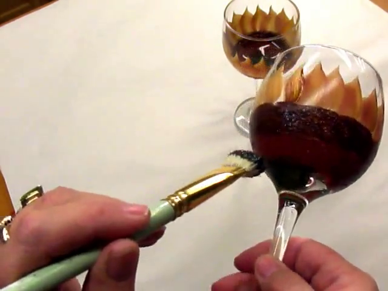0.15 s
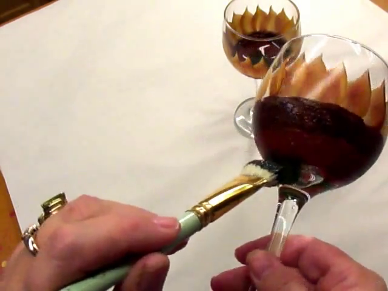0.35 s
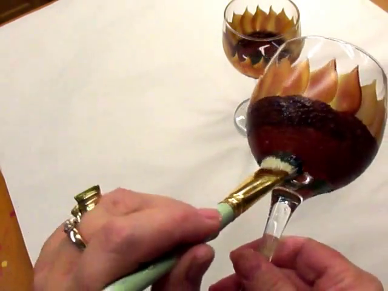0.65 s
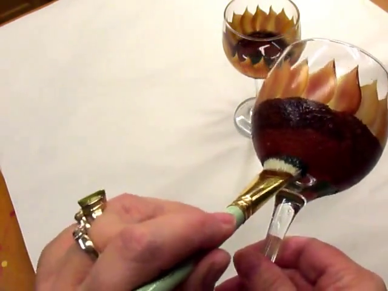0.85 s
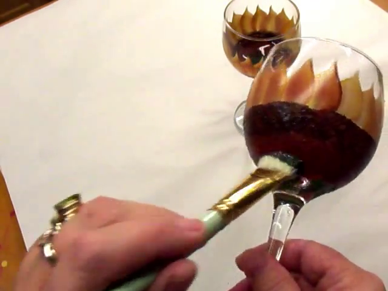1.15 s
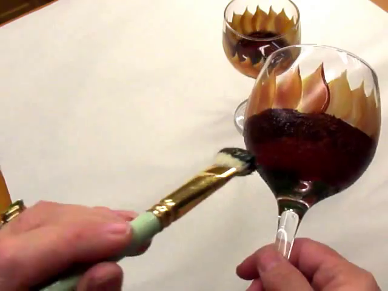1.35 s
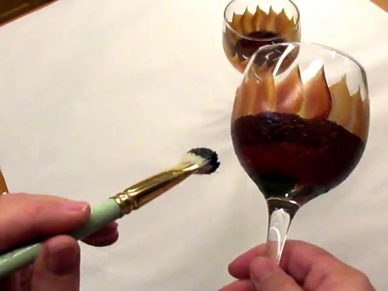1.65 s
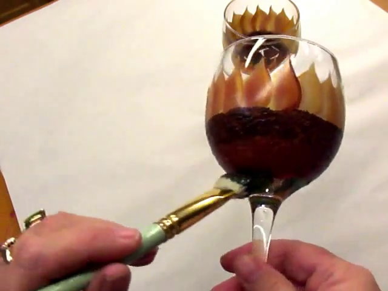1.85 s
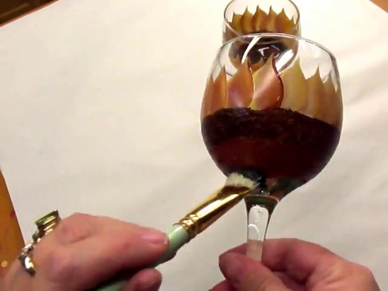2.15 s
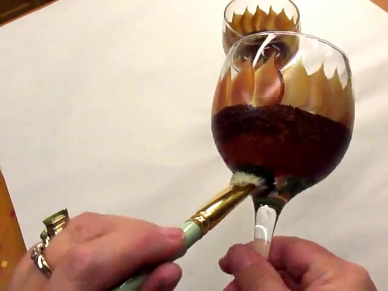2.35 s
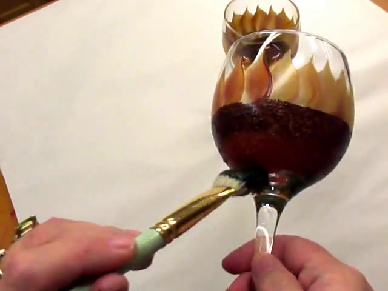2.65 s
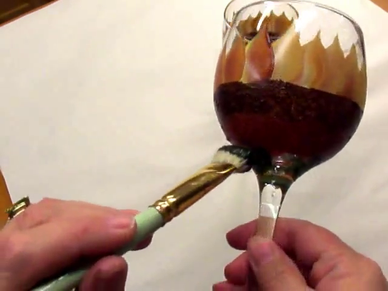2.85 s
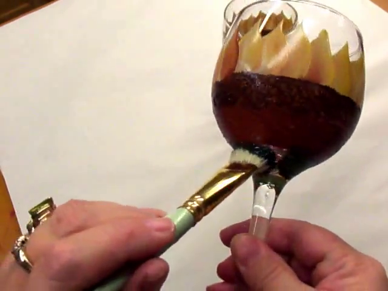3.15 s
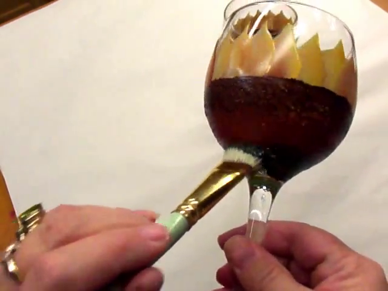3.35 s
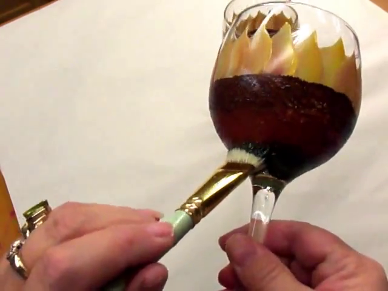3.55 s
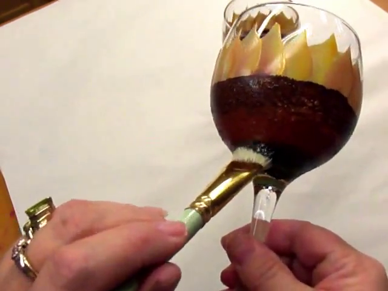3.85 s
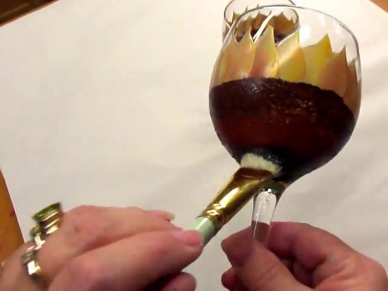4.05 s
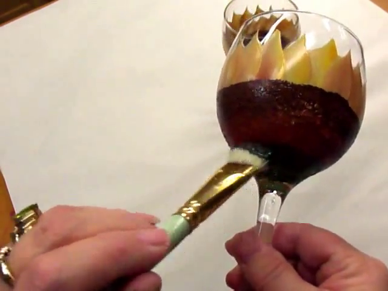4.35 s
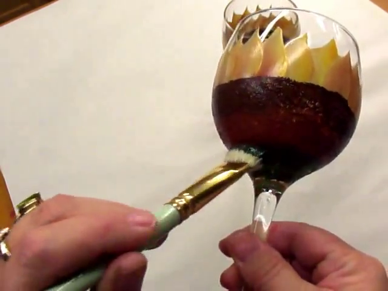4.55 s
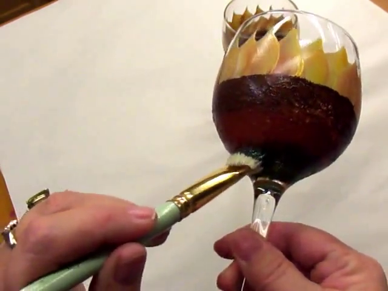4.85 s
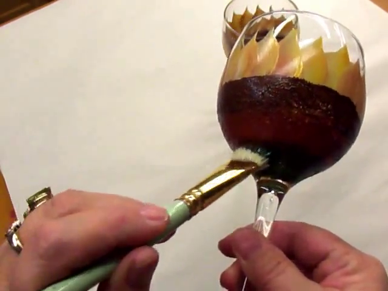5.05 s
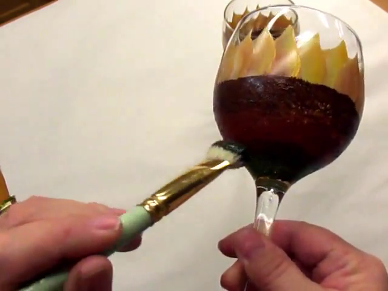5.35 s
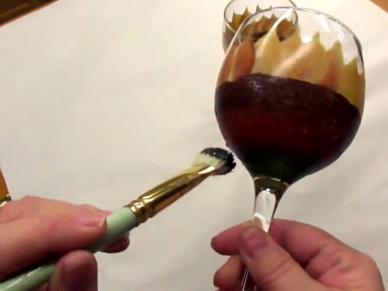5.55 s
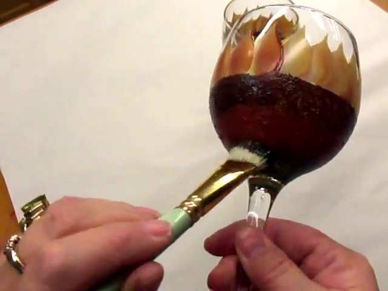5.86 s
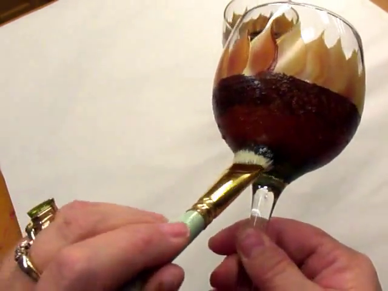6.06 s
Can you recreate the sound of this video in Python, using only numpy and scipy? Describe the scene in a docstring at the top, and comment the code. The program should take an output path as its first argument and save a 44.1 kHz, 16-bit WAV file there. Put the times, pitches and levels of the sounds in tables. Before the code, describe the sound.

Close by in a small quiet room, a brush dabs tacky paint on a wine glass. A few tiny snaps come early, then the glass knocks once on the table: a loud, hard clack with a thump and a short glassy ring. Afterwards the snaps grow dense, then thin to fine crackle. Soft air noise, mains hum and a faint fan whine run underneath.

```python
"""A flat brush dabs wet paint on a hand-held wine glass in a small, quiet room.
Air noise, mains hum and a faint fan whine lie underneath; the whine swells about one second in and holds.
Tacky paint lets go in tiny snaps: a few early on, a dense run in the middle, fine crackle to the end.
In between, at 2.5 s, the glass knocks once on the table: a clack, a thump and a faintly ringing bowl.
Snaps are filtered pulses, the knock is fading sines and noise, the background is noise and steady sines."""
import sys
import numpy as np
from scipy import signal
from scipy.fft import rfft, irfft
from scipy.io import wavfile

SR = 44100
rng = np.random.default_rng(int(sys.argv[2]) if len(sys.argv) > 2 else 0)


def waveform_to_disk(signal):
    """Save audio, clipped to [-1, 1], as 16-bit WAV at the path in sys.argv[1]."""
    frames = np.transpose(np.atleast_2d(signal))
    scaled = np.clip(frames, -1, 1) * 32767
    samples = np.round(scaled).astype(np.int16)
    wavfile.write(sys.argv[1], SR, samples)


N = 273552  # length of the sound in samples


def brush():
    """Paint and bristles let go of the glass close by; the room answers a little."""
    dry = snaps(gain_db=-0.5, rustle=0.12, rustle_t60_s=0.0095)
    dry = dry + crackle(per_second=330, spread_db=8, pitch_hz=4400, width_hz=5000)
    # a gentle low-pass rounds off the very top of the snaps and crackle
    low_pass = signal.butter(4, 10300, fs=SR, output="sos")
    dry = signal.sosfilt(low_pass, dry)
    return room(dry, wet_db=-8.5, t60_s=0.089, gap_s=0.004)


# The loudest snaps of paint; peak level is before the brush gain, glass_db is how strongly the glass answers.
# Columns: start_s, peak_db, pitch_hz, width_hz, glass_db
LOUD_SNAPS = [(0.7575, -24, 5100, 6500, 2), (0.782, -35, 5000, 4000, -2), (0.9255, -36, 2800, 3600, -2),
              (1.06, -33, 4600, 6000, -4), (1.0733, -34, 4200, 8000, 0), (1.1461, -28, 3200, 6400, -6),
              (1.1567, -28, 4200, 8400, 0), (1.16, -29, 2800, 5200, 4), (1.1667, -30, 4600, 4600, -2),
              (1.2709, -34, 4600, 4600, -2), (2.2395, -19, 5940, 9300, -8), (2.3911, -29.5, 6200, 3700, -2),
              (3.173, -34.5, 4600, 3700, -2), (3.2637, -24.5, 4550, 2700, -6), (3.2783, -29, 3600, 4700, 0),
              (3.5353, -31, 4200, 6700, -6), (3.6138, -29.5, 3200, 5100, -6), (3.6884, -25, 2600, 6800, -9),
              (3.704, -27, 3800, 4900, -6), (3.798, -26, 8000, 8040, -2), (3.807, -25.5, 6750, 10800, 3),
              (3.8183, -30, 4400, 7000, 0), (3.9017, -34, 5000, 4000, -2), (3.9453, -20, 4200, 12000, -6),
              (4.0123, -29, 4800, 3800, -4), (4.0322, -25.5, 4200, 5500, -10), (4.183, -31, 8200, 4900, -2),
              (4.2123, -21.5, 7300, 7350, 0), (4.2922, -26, 6000, 6000, 0), (4.2968, -25.5, 7000, 7000, -2),
              (4.3038, -23, 6440, 6400, -5), (4.3307, -30, 5500, 4600, -6), (4.342, -33, 6000, 7800, -4),
              (4.363, -30.5, 6000, 7000, -2), (4.6922, -30, 5200, 11000, 10),
              (4.7093, -31.5, 6600, 10500, -2), (5.258, -34, 3400, 5400, -6)]
# A snap tears a neighbouring thread soon after: weaker, and at a nearby pitch.
FOLLOW_GAP_S, FOLLOW_SPREAD_S = 0.005, 0.018
FOLLOW_DB, FOLLOW_OCTAVES = -16, 0.25


def snaps(gain_db, rustle, rustle_t60_s):
    """Each loud snap of paint, and the weaker one that it sets off a moment later."""
    out = np.zeros(N)
    for start_s, peak_db, pitch_hz, width_hz, glass_db in LOUD_SNAPS:
        wait, detune = rng.random(2)
        peak_db = peak_db + gain_db
        first = snap(peak_db, pitch_hz, width_hz, glass_db, rustle, rustle_t60_s)
        add(out, start_s, first)

        next_s = start_s + FOLLOW_GAP_S + FOLLOW_SPREAD_S * wait
        next_hz = pitch_hz * 2 ** (FOLLOW_OCTAVES * (2 * detune - 1))
        follower = snap(peak_db + FOLLOW_DB, next_hz, width_hz, glass_db, rustle, rustle_t60_s)
        add(out, next_s, follower)
    return out


# What the glass answers a snap with; each snap's glass_db is added to the level.
# Columns: pitch_hz, width_hz, level_db
GLASS_ANSWER = [(1410, 390, -4), (2200, 130, 3), (2750, 230, 0), (3060, 87, -25.5)]


def snap(peak_db, pitch_hz, width_hz, glass_db, rustle, rustle_t60_s):
    """A thread of paint breaks in one sharp pulse; the freed bristle quivers and the glass rings briefly."""
    t = np.arange(SR // 40) / SR
    quiver = rustle * rng.standard_normal(len(t)) * fade(t, rustle_t60_s)
    pulse = (t == 0) + quiver
    click = band(band(pulse, pitch_hz, width_hz), pitch_hz, width_hz)
    envelope = np.abs(signal.hilbert(click))
    click = click * undb(peak_db) / envelope.max()
    glass = sum(undb(mode_db + glass_db) * band(click, mode_hz, mode_width_hz)
                for mode_hz, mode_width_hz, mode_db in GLASS_ANSWER)
    return click + glass


# The brush works in the paint; level is that of the fine crackle before low-pass and room.
# Columns: start_s, end_s, level_db
BRUSH_DABS = [(0.9, 1.4, -70), (2.1, 3.35, -68.5), (3.35, 3.9, -63.5), (3.9, 5.3, -66), (5.65, 6.2, -67)]
DAB_EASE_S = 0.13  # the bristles take this long to bend and to straighten


def crackle(per_second, spread_db, pitch_hz, width_hz):
    """Countless smaller snaps at random moments while the brush presses and lifts."""
    pressure = np.zeros(N)
    for start_s, end_s, level_db in BRUSH_DABS:
        pressure += undb(level_db) * (ramp(start_s, DAB_EASE_S) - ramp(end_s, DAB_EASE_S))
    # many small grains and a few large ones, pushing either way
    size_db = spread_db * np.minimum(rng.exponential(size=N), 3)
    sizes = undb(size_db) * rng.choice([-1, 1], N)
    grains = sizes * (rng.random(N) < per_second / SR)
    coloured = band(band(grains, pitch_hz, width_hz), pitch_hz, width_hz)
    return level(coloured, 0) * pressure


def room(x, wet_db, t60_s, gap_s):
    """Direct sound, then a short spray of reflections from table and walls."""
    t = np.arange(SR // 2) / SR
    tail = rng.standard_normal(len(t)) * fade(t, t60_s) * (t > gap_s)
    tail = tail / np.linalg.norm(tail)
    return x + undb(wet_db) * signal.fftconvolve(x, tail)[:N]


KNOCK_S = 2.5174  # when the glass meets the table


def knock():
    """One hard contact clacks and sets table, foot and bowl ringing; the room dies away behind it."""
    out, t = np.zeros(N), np.arange(SR) / SR
    contact_s = 0.00025  # how quickly ring and crack come in
    contact = 1 - np.exp(-t / contact_s)
    struck = ring(t, gain_db=0.9) + crack(t, start_db=-24.5, t60_s=0.013)
    dense = dense_ringing(t, early_db=-24.5, early_t60_s=0.081, build_s=0.0027,
                          late_db=-32, late_t60_s=0.26)
    add(out, KNOCK_S, clack(t) + struck * contact + dense)
    # the microphone's low cut thins the deep bass of the knock
    return signal.sosfilt(signal.butter(2, 85, "high", fs=SR, output="sos"), out)


# The clack while foot and table are still pressed together.
# Columns: pitch_hz, level_db, length_s
CONTACT_CLACK = [(1270, -13.5, .0046), (3190, -18, .003)]


def clack(t):
    """Short sine bursts that swell and sink once during the contact."""
    out = np.zeros(len(t))
    for pitch_hz, level_db, length_s in CONTACT_CLACK:
        push = np.sin(np.pi * np.minimum(t / length_s, 1))
        out += undb(level_db) * np.sin(2 * np.pi * pitch_hz * t) * push
    return out


def crack(t, start_db, t60_s):
    """A bright burst of noise around 7.7 kHz that fades at once."""
    return level(band(rng.standard_normal(len(t)), 7700, 6000), start_db) * fade(t, t60_s)


# What table, foot and bowl ring with; level is before the ring gain, t60_s is the time to lose 60 dB.
# Columns: pitch_hz, level_db, t60_s
RING_MODES = [(126, -41.5, 0.11), (205, -24.5, 0.2), (407, -34.5, 0.085), (555, -33.5, 0.15),
              (910, -15.5, .009), (983, -24.5, 0.07), (1115, -55, 1), (1193, -32, 0.15), (1280, -27, 0.02),
              (1316, -26.5, 0.12), (1430, -28.5, 0.16), (1506, -11, .021), (1910, -29.5, 0.067),
              (2120, -32, .146), (2152, -38, .17), (2224, -20, .055), (2319, -41, .88), (2395, -35, .07),
              (2590, -34, .064), (2886, -25, 0.14), (2890, -27, 0.08), (3230, -8, 0.013),
              (3304, -33, 0.098), (3400, -38, 0.08), (3650, -37.5, 0.18), (4800, -26, 0.02),
              (6600, -25, 0.016), (7030, -37, 0.15)]


def ring(t, gain_db):
    """Each way the struck objects can vibrate is a sine that fades at its own speed."""
    out = np.zeros(len(t))
    for k, (pitch_hz, level_db, t60_s) in enumerate(RING_MODES):
        # neighbouring modes swing in opposite directions at the point of contact
        direction = (-1) ** k
        out += direction * undb(level_db) * np.sin(2 * np.pi * pitch_hz * t) * fade(t, t60_s)
    return undb(gain_db) * out


# Colour of the dense ringing of table and room after the knock; only the shape matters.
# Columns: pitch_hz, level_db
DENSE_COLOUR = [(40, -30), (85, -12), (130, -4), (220, 1), (420, -9), (750, -1.5), (1400, -7), (1900, -5),
                (3200, -3), (4700, -10), (7000, -12), (9500, -13.5), (11500, -26)]


def dense_ringing(t, early_db, early_t60_s, build_s, late_db, late_t60_s):
    """Ringing too dense to hear single notes: noise that builds up, then fades fast and later slowly."""
    tail = undb(early_db) * fade(t, early_t60_s) + undb(late_db) * fade(t, late_t60_s)
    build_up = 1 - np.exp(-t / build_s)
    return noise(DENSE_COLOUR, size=len(t)) * tail * build_up


def background():
    """Steady air noise with mains hum and the thin whine of a fan."""
    return air() + hum() + fan_whine()


# Colour of the room air; only the shape matters, AIR_DB sets the loudness.
# Columns: pitch_hz, level_db (per Hz)
AIR_COLOUR = [(15, -63), (25, -26.5), (134, -10), (160, -5.5), (267, -4.5), (353, -4), (545, -4.5),
              (588, -4), (635, -5), (740, -4.5), (3320, -12.5), (3770, -15), (4070, -14.5), (9930, -19),
              (11000, -23), (14300, -123), (22000, -120)]
AIR_DB = -54  # rms


def air():
    """The quiet rush of room air, as noise shaped over pitch."""
    return undb(AIR_DB) * noise(AIR_COLOUR, size=N)


# Steady tones of the mains hum.
# Columns: pitch_hz, level_db (rms)
HUM_TONES = [(120, -84.5), (360, -72), (480, -72.5), (600, -67)]


def hum():
    """Mains hum: steady sines, each starting at a random point of its swing."""
    t = np.arange(N) / SR
    # a sine's peak is the square root of 2 times its rms level
    return sum(undb(level_db) * np.sqrt(2) * np.sin(2 * np.pi * (pitch_hz * t + rng.random()))
               for pitch_hz, level_db in HUM_TONES)


# Narrow whistles of the fan; level is before the swell below.
# Columns: pitch_hz, width_hz, level_db (rms)
FAN_WHISTLES = [(3768, 83, -71), (5400, 120, -77.5)]
# The whine comes up once and then holds.
WHINE_ON_S, WHINE_RISE_S = 1.02, 0.31
WHINE_BEFORE_DB, WHINE_AFTER_DB = -15, 1


def fan_whine():
    """The fan whistles as narrow bands of noise."""
    whine = sum(level(band(rng.standard_normal(N), pitch_hz, width_hz), level_db)
                for pitch_hz, width_hz, level_db in FAN_WHISTLES)
    rise_db = WHINE_AFTER_DB - WHINE_BEFORE_DB
    return whine * undb(WHINE_BEFORE_DB + rise_db * ramp(WHINE_ON_S, WHINE_RISE_S))


def undb(db):
    """Decibels to gain."""
    return 10 ** (np.asarray(db) / 20)


def level(x, db):
    """The sound at a given rms (average) level."""
    return x * undb(db) / np.sqrt(np.mean(x ** 2))


def fade(t, t60_s):
    """Decay that loses 60 dB in t60_s."""
    return np.exp(-np.log(1000) * t / t60_s)


def ramp(start_s, length_s):
    """A straight rise from 0 to 1."""
    return np.clip((np.arange(N) / SR - start_s) / length_s, 0, 1)


def add(out, start_s, x):
    """Mix x into out from start_s on."""
    i = int(start_s * SR)
    out[i:i + len(x)] += x[:len(out) - i]


def band(x, pitch_hz, width_hz):
    """One resonance, gain 1 at its centre; very high or wide settings are capped."""
    centre_hz = min(pitch_hz, 0.45 * SR)
    sharpness = pitch_hz / min(width_hz, 0.3 * SR)
    b, a = signal.iirpeak(centre_hz, sharpness, SR)
    return signal.lfilter(b, a, x)


def noise(points, size):
    """Noise of rms 1 whose spectrum follows points of (pitch_hz, level_db)."""
    pitch_hz, level_db = np.transpose(points)
    f = np.maximum(np.fft.rfftfreq(size, 1 / SR), 1)
    colour = undb(np.interp(np.log(f), np.log(pitch_hz), level_db))
    return level(irfft(rfft(rng.standard_normal(size)) * colour, size), 0)


def scene():
    """Brush, knock and background at one microphone."""
    return (brush() + knock() + background())[None]


def record(dry):
    """The treble is cut steeply above 11150 Hz."""
    low_pass = signal.ellip(10, 0.2, 70, 11150, fs=SR, output="sos")
    return signal.sosfilt(low_pass, dry)


dry = scene()
out = record(dry)
waveform_to_disk(out)
```